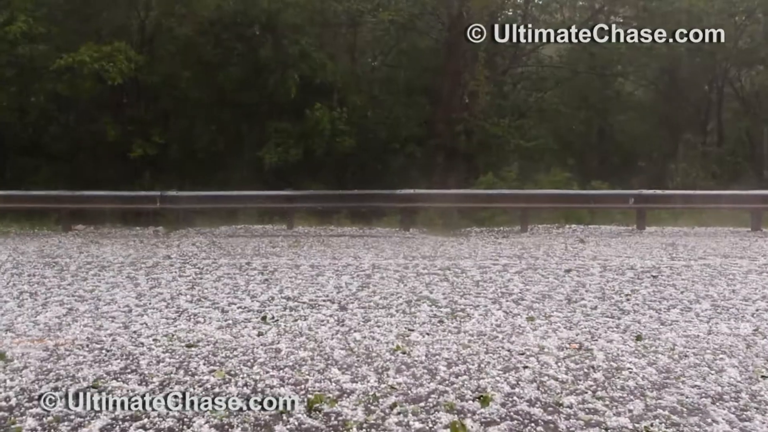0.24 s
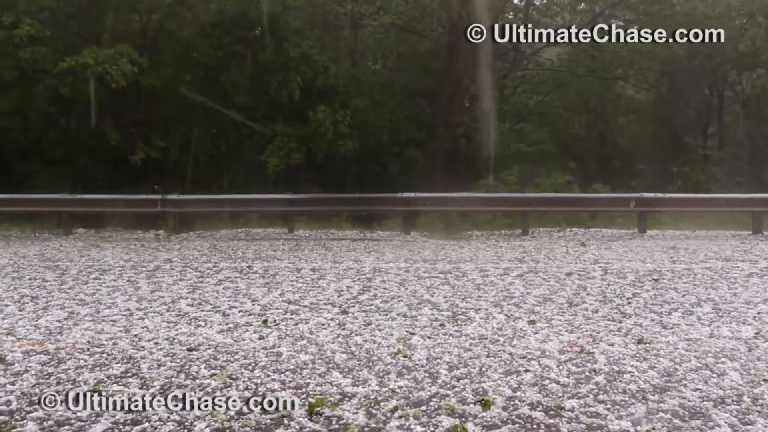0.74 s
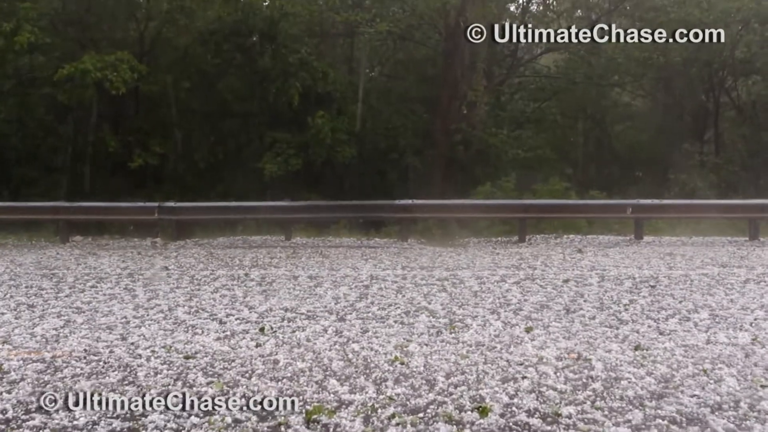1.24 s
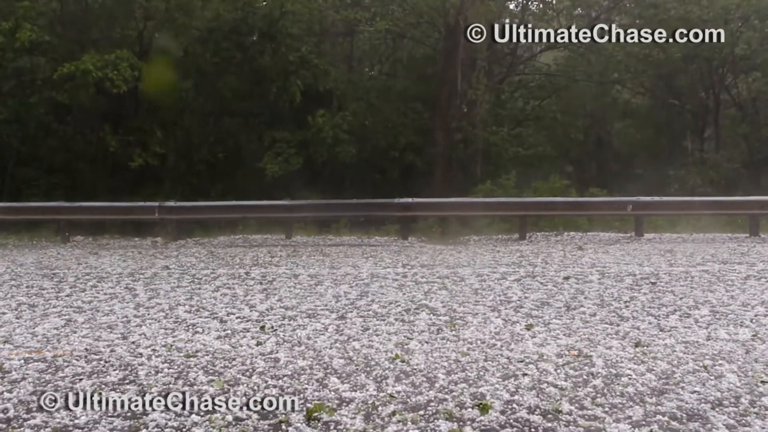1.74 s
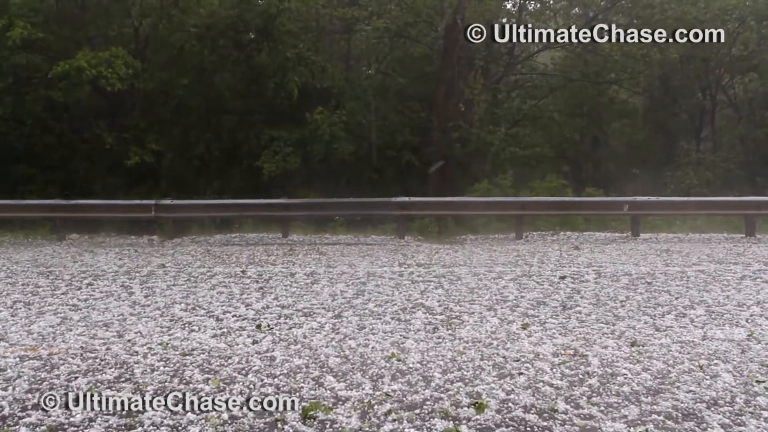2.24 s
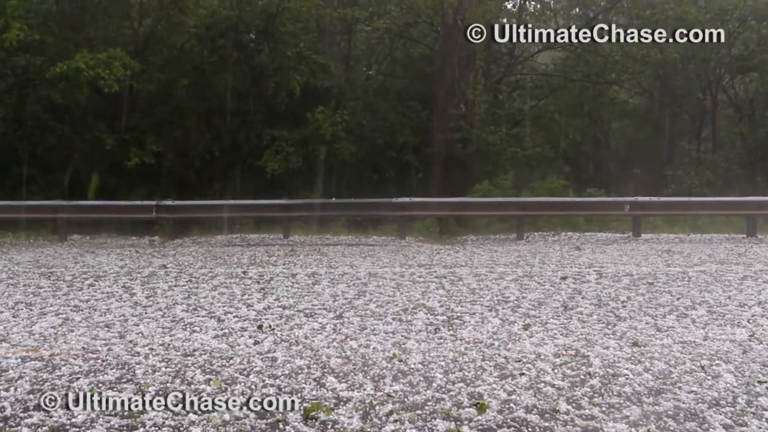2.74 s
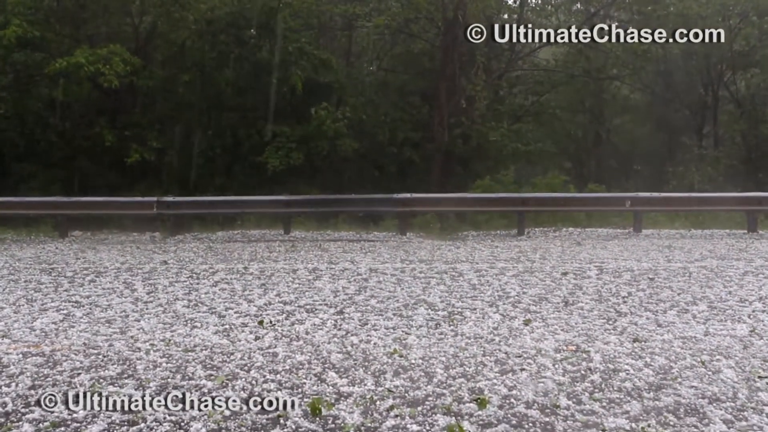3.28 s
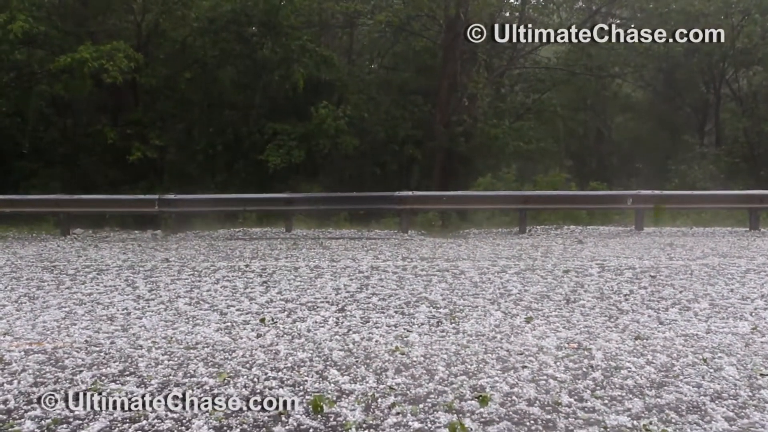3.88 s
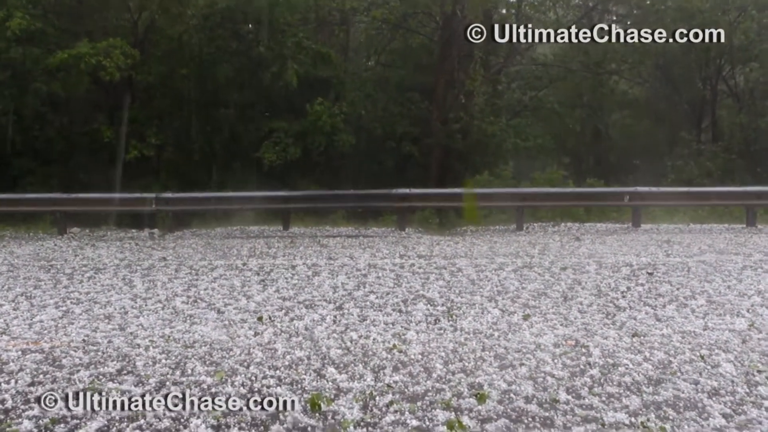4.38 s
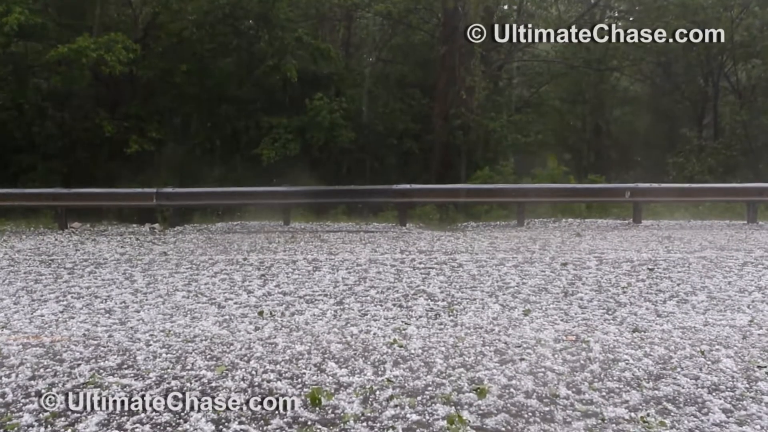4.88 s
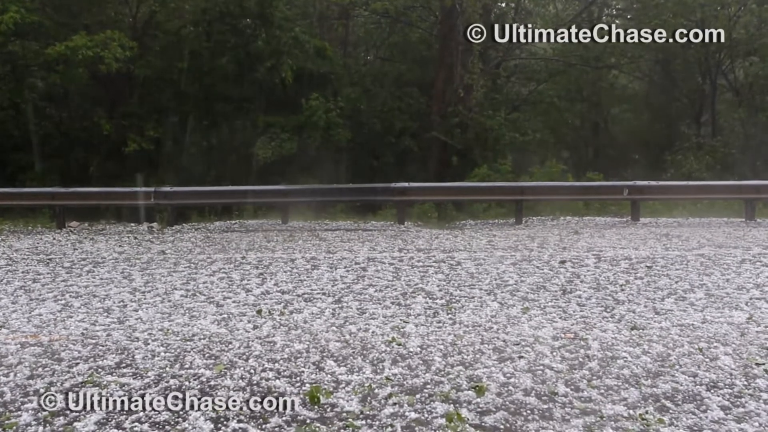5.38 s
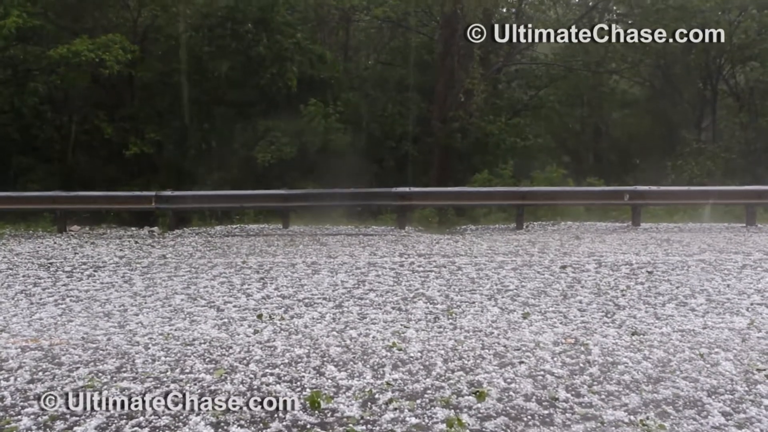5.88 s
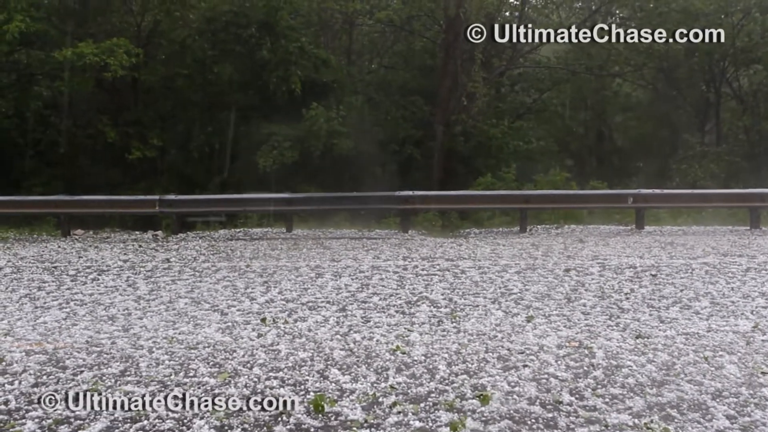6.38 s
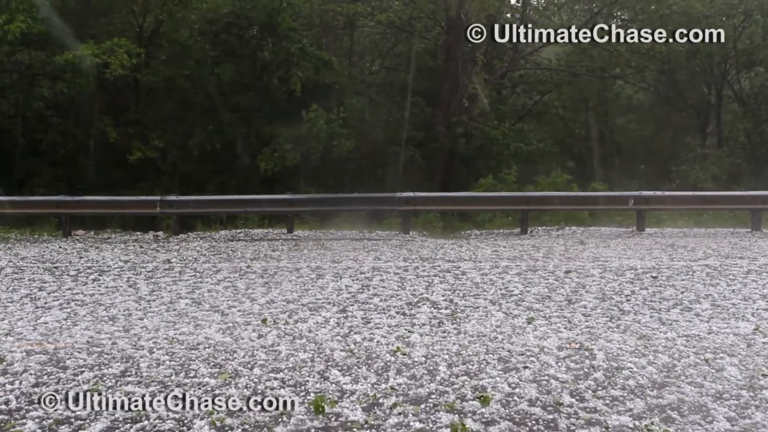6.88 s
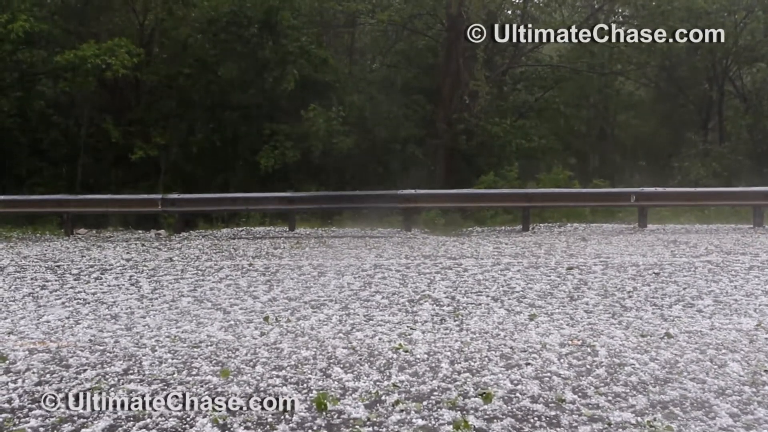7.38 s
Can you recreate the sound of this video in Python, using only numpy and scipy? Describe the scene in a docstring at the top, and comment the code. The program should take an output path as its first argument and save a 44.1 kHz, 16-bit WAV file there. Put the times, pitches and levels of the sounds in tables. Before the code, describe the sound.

Heard inside a parked car, dense hail bangs hollowly overhead, cracks against the windows, then thins slightly over pattering, hissing small stones.

```python
"""Hail on a parked car

Heard from inside: big stones boom on the sheet-metal roof, made from many ringing modes and a quick dent.
Others crack on the glass: noise bursts with a short ring and bright splinters. Chips of ice snap as tiny bursts.
A loose metal trim rings as a few fading tones. Small stones patter on the body and hiss on the road:
shaped noise and short knocks. A fast limiter holds the peaks of the whole mix.
"""
import sys
import numpy as np
from scipy import signal
from scipy.fft import rfft, irfft, next_fast_len
from scipy.io import wavfile
from scipy.ndimage import uniform_filter1d, minimum_filter1d, map_coordinates

SR = 44100
rng = np.random.default_rng(int(sys.argv[2]) if len(sys.argv) > 2 else 0)


def master(y):
    """Save y as 16-bit WAV."""
    cut = np.clip(np.atleast_2d(y).T, -1, 1)
    pcm = np.round(cut * 32767)  # scale
    wavfile.write(sys.argv[1], SR, pcm.astype(np.int16))


N = 336480  # samples in the scene


def amp(db):
    """Turn decibels into a plain factor."""
    return 10 ** (np.asarray(db) / 20)


def unit(x):
    """Scale each row to an average (RMS) strength of 1."""
    return x / np.sqrt(np.mean(x ** 2, axis=-1, keepdims=True) + 1e-20)


def along(points, hz):
    """Read a curve of (Hz, value) points at hz, on a log pitch axis."""
    f, v = np.transpose(points)
    return np.interp(np.log(hz + 1), np.log(f + 1), v)


def coloured(x, points):
    """Shape the spectrum of x by (Hz, dB) points, without shifting it in time."""
    n = x.shape[-1]
    m = next_fast_len(n + 512)
    gain = amp(along(points, np.fft.rfftfreq(m, 1 / SR)))
    return irfft(rfft(x, m) * gain, m)[..., :n]


def wobble(rate):
    """A smooth random curve with `rate` random points a second."""
    points = rng.standard_normal(int(N * rate / SR) + 4)
    return map_coordinates(points, [np.arange(N) * rate / SR])


def placed(times, sounds):
    """Add each row of sounds at its own time."""
    out = np.zeros(N + sounds.shape[1])
    for s, sound in zip(times, sounds):
        out[int(s * SR):][:len(sound)] += sound
    return out[:N]


def patter(rate, spread_db, t60):
    """A level curve that jumps with every small random stone and dies away; stone powers add up."""
    chance, size = rng.random(N), rng.exponential(size=N)
    stones = (chance < rate / SR) * amp(spread_db * size.clip(0, 3))
    t = np.arange(SR // 4) / SR
    power = signal.fftconvolve(stones ** 2, amp(-120 * t / t60))[:N]
    return np.sqrt(np.abs(power))  # abs: the fast convolution can dip just below zero


PELLET_HZ, PELLET_CYCLES = 2200, 14  # middle pitch; cycles a knock takes to fade by 60 dB


def pellets(count=1400):
    """Small stones knock at a pitch of their own: short fading tones of scattered pitch and size."""
    when, pitch = rng.random(count), rng.standard_normal((count, 1))
    size = rng.exponential(size=(count, 1))
    t = np.arange(SR // 50) / SR
    hz = (PELLET_HZ * amp(5 * pitch)).clip(500, 7000)
    fade = amp(2.6 * size.clip(0, 3) - 60 * t * hz / PELLET_CYCLES)
    return unit(placed(when * N / SR, fade * np.sin(2 * np.pi * hz * t)))


# Drumming of small stones on the body: (time [s], level [dB])
DRUM_LEVELS = [(0.0, -22), (0.36, -34.5), (1.55, -32.5), (1.78, -45), (2.12, -31), (3.23, -37), (4.27, -31),
               (4.59, -42), (5.61, -34.5), (6.33, -41), (7.2, -29), (7.63, -39.5)]
# Tone of many small stones on the body: (frequency [Hz], level per hertz [dB])
DRUM_TONE = [(25, -6.5), (134, 3.5), (294, 7.5), (604, 2), (753, -3.5), (3000, -21.5), (3900, -71)]
# Tone of hail on the road: (frequency [Hz], level per hertz [dB])
HISS_TONE = [(710, -4), (1200, -5), (1550, -5.5), (6490, -13), (10800, -13), (14100, -23), (14900, -48),
             (15400, -78)]
HISS_DB, HISS_FADE_DB, HISS_FADE_S = -45.5, 6, 3.25  # the hiss group starts 6 dB higher and settles
TAPS_DB, PELLETS_DB, TICKS_DB = -3.5, -3.5, -5.5  # against the road hiss


def storm():
    """Small stones drum on the body, hiss on the road, tap nearby and shatter in bright ticks: shaped noise."""
    s, drum_db = np.transpose(DRUM_LEVELS)
    t = np.arange(N) / SR
    drum_noise, hiss_noise, tap_noise, tick_noise = rng.standard_normal((4, N))
    drum_swell = patter(60, spread_db=6.5, t60=0.12) + 1.84  # stones over a steady share
    drum = unit(coloured(drum_noise * drum_swell, DRUM_TONE))
    hiss = unit(coloured(hiss_noise, HISS_TONE)) * amp(1.7 * wobble(22))
    taps = unit(coloured(tap_noise * patter(260, spread_db=3.5, t60=0.018), GLASS_TONE))
    ticks = unit(coloured(tick_noise * patter(200, spread_db=5.0, t60=0.009), SPLINTER_TONE))
    road = hiss + amp(TAPS_DB) * taps + amp(PELLETS_DB) * pellets() + amp(TICKS_DB) * ticks
    road_db = HISS_DB + HISS_FADE_DB * np.exp(-t / HISS_FADE_S)
    return amp(np.interp(t, s, drum_db)) * drum + amp(road_db) * road


# Big stones on the roof: (time [s], level [dB], loudest panel pitch [Hz],
# sharp-edge level [dB], fade by 60 dB from the panel's own damping [s])
ROOF_HITS = [(0.002, -7.5, 345, -18, 0.22), (0.02, -7, 950, -9.5, 0.36), (0.131, -16.5, 453, -10, 0.59),
             (0.172, -14, 388, -11, 0.55), (0.215, -7.5, 280, -12.5, 0.19), (0.2662, -6, 655, -11.5, 0.52),
             (0.297, 0.5, 887, -13, 0.55), (0.317, -9, 1040, -7, 0.33), (0.331, -4, 680, -12, 0.35),
             (0.391, -3.5, 318, -16, 0.25), (0.424, -13.5, 302, -15, 0.72), (0.485, -16.5, 584, -14, 0.72),
             (0.547, -12, 960, -12.5, 0.6), (0.571, -8, 935, -22, 0.48), (0.627, -9, 387, -15, 0.12),
             (0.673, -11, 350, -12.5, 0.6), (0.721, -7.5, 275, -14.5, 0.82),
             (0.794, -7.5, 533, -10.5, 0.58), (0.814, -10.5, 300, -37, 1), (0.861, -9.5, 476, -16.5, 1),
             (1.046, -4, 617, -10, 0.16), (1.122, -15.5, 850, -10, 0.19), (1.235, -7, 259, -8, 0.5),
             (1.261, -10, 300, -16, 1), (1.303, -20, 316, -6, 1), (1.367, -9, 590, -14.5, 0.63),
             (1.432, -13, 376, -6.5, 1), (1.447, -7.5, 1100, -14, 1), (1.48, -7.5, 250, -14.5, 1),
             (1.616, -18, 300, -8.5, 0.66), (1.652, -18.5, 432, -19, 0.46), (1.871, -16, 610, -13, 0.91),
             (1.886, -6.5, 960, -15, 0.83), (1.93, -7, 405, -10.5, 0.58), (1.962, -4, 427, -10.5, 0.84),
             (2.107, -2, 354, -11.5, 0.39), (2.148, -7, 250, -13.5, 0.88), (2.344, -14.5, 595, -10.5, 0.53),
             (2.403, -17.5, 590, -16, 0.97), (2.473, -14, 980, -15, 0.74), (2.54, -7, 304, -14.5, 0.47),
             (2.67, -5.5, 890, -18.5, 0.27), (2.731, -14, 256, -16.5, 1), (2.758, -10, 590, -14, 0.53),
             (2.896, -17.5, 314, -21, 0.31), (2.96, -14.5, 345, -32, 0.18), (3.2, -9, 276, -15, 0.55),
             (3.339, -19.5, 604, -3, 0.21), (3.4394, -8.5, 1280, -3, 0.063), (3.595, -10, 370, -13, 1),
             (3.628, -10.5, 440, -23, 0.59), (3.654, -14.5, 272, -3.5, 0.12), (3.709, -6.5, 274, -21, 1),
             (3.738, -6.5, 1060, -9, 1), (3.759, -9, 516, -30, 0.96), (3.921, -17, 576, -2.5, 0.11),
             (3.984, -16.5, 434, -15, 0.42), (4.058, -9, 315, -27.5, 0.24), (4.202, -11, 1020, -20, 0.37),
             (4.218, -11.5, 587, -14.5, 0.97), (4.251, -6.5, 450, -26, 0.89), (4.37, -6, 280, -19, 0.54),
             (4.468, -13, 325, -19, 0.21), (4.613, -19, 437, -8, 0.77), (4.663, -32, 1400, 9.5, 0.31),
             (4.766, -30, 369, -9, 0.49), (4.831, -17.5, 550, -15, 0.52), (4.869, -7.5, 290, -27, 0.23),
             (4.888, -16, 332, -24, 1), (5, -15.5, 1040, -22, 1), (5.165, -17.5, 870, -8, 1),
             (5.256, -7, 470, -7, 0.11), (5.344, -26.5, 1100, -1.5, 0.71), (5.383, -9, 910, -9.5, 0.34),
             (5.401, -8, 886, -15.5, 0.42), (5.438, -12.5, 630, -32, 0.66), (5.579, -24, 250, -6, 0.77),
             (5.632, -8, 608, -12.5, 0.48), (5.764, -13, 590, -16, 0.42), (5.879, -8.5, 329, -18.5, 0.49),
             (5.912, -13, 396, -3, 0.1), (5.944, -18.5, 288, -13, 0.73), (6.024, -26, 1090, -1.5, 0.6),
             (6.07, -14.5, 350, -16, 0.11), (6.162, -10.5, 640, -7.5, 0.16), (6.211, -14, 1320, -6, 0.13),
             (6.256, -23.5, 520, -17, 0.36), (6.407, -18, 477, -17, 0.94), (6.461, -28, 358, 1, 1),
             (6.492, -11.5, 930, -9.5, 0.79), (6.508, -4, 596, -16, 0.4), (6.562, -15, 357, -32, 0.73),
             (6.744, -12, 630, -14, 0.16), (6.797, -22, 413, -6, 0.51), (6.815, -15, 764, -9.5, 0.23),
             (6.915, -6.5, 362, -9, 1), (6.984, -9.5, 1040, -19, 1), (7.048, -16, 317, -10, 0.2),
             (7.085, -16, 300, -37, 0.077), (7.154, -15, 570, -13, 0.97), (7.176, -11, 980, -23, 0.8),
             (7.209, -25, 313, -5, 0.81), (7.312, -10, 264, -22.5, 0.95), (7.437, -23.5, 610, -16, 0.33),
             (7.581, -9, 290, -15, 1)]
# Strength of the roof modes: (frequency [Hz], level [dB])
ROOF_TONE = [(40, -54), (100, -1), (150, 2.5), (174, 6), (205, -4), (320, 3.5), (600, 3), (1100, 2.5),
             (2000, -0.5), (4000, -10), (8000, -26)]
# How long the roof modes ring: (frequency [Hz], fade by 60 dB [s])
ROOF_FADE = [(80, 1), (200, 1), (500, 0.53), (1200, 0.28), (3000, 0.17), (6000, 0.083)]
EDGE_USUAL_DB, PANEL_USUAL_HZ = -10, 440  # an ordinary blow
BOOM_DB, BOOM_PER_EDGE, BOOM_DB_PER_OCTAVE = -10, -0.29, -1.5  # sharp blows and small, high panels boom less
DULL_PER_EDGE = 0.35  # dB an octave of tilt for each dB of edge: soft blows are dull throughout
DENT_DB, DENT_DB_PER_OCTAVE = -7, -6.5  # the dent is strongest on wide, low panels
DENT_HZ, DENT_T60 = 319, 0.038  # middle pitch; seconds to fade by 60 dB
SPREAD_S = 0.0013  # time for the ringing to spread through the sheet


def roof(count=340):
    """A plate has dense modes; each stone lands elsewhere and stirs them anew, most those of its own panel."""
    s, db, panel_hz, edge_db, t60 = np.transpose(ROOF_HITS)[:, :, None]
    sharper_db = edge_db - EDGE_USUAL_DB
    panel_octaves = np.log2(panel_hz / PANEL_USUAL_HZ)
    boom_db = BOOM_DB + BOOM_PER_EDGE * sharper_db + BOOM_DB_PER_OCTAVE * panel_octaves

    t = np.arange(2 * SR // 5) / SR
    hz = 45 + 7955 * ((np.arange(count) + rng.random(count)) / count) ** 1.8
    rise = 1 - np.exp(-t * hz[:, None] / 1.66)  # low modes swell more slowly
    fade = amp(-60 * t / along(ROOF_FADE, hz)[:, None])
    modes = np.sin(2 * np.pi * (hz[:, None] * t + rng.random((count, 1)))) * fade * rise

    spacing = np.sqrt(np.gradient(hz).clip(1))  # a lone mode stands for a wider band
    away = np.log(hz / panel_hz)
    panel = amp(7 * np.exp(-(away / 0.09) ** 2) + 6.4 * np.exp(-(away / 2.2) ** 2))  # a peak on a broad hump
    tilt = amp(DULL_PER_EDGE * sharper_db * np.log2(hz.clip(250, 1500) / PANEL_USUAL_HZ))
    strength = rng.standard_normal((len(s), count)) * amp(along(ROOF_TONE, hz)) * spacing * panel * tilt

    # Each blow has a low boom, a middle body and a sharp high edge.
    low = along([(180, 1.0), (300, 0.01)], hz)
    high = along([(1200, 0.055), (2000, 0.85)], hz)
    blows = unit(strength * (1 - low - high))
    blows += amp(boom_db) * unit(strength * low) + amp(edge_db) * unit(strength * high)
    ring = amp(-60 * t / t60) * (blows @ modes) / np.sqrt(2 * count)  # peaks near 1

    # The sheet first gives under the stone.
    dent_db = DENT_DB + DENT_DB_PER_OCTAVE * panel_octaves
    dent_hz = DENT_HZ * amp(rng.standard_normal(s.shape))
    dent = -amp(dent_db - 60 * t / DENT_T60) * np.sin(2 * np.pi * dent_hz * t)
    return placed(s[:, 0], amp(db) * (dent + ring * (1 - np.exp(-t / SPREAD_S))))


# Stones cracking on glass: (time [s], level [dB], splinter level [dB],
# pitch of the spot [Hz], fade by 60 dB [s])
GLASS_HITS = [(0.022, -17, -14, 1540, 0.042), (0.3062, -15, -18, 1780, 0.075),
              (0.3257, -11, -30, 1620, 0.062), (0.3983, -13.5, -21, 1500, 0.083),
              (0.4253, -17.5, -31, 2900, 0.084), (0.4877, -17.5, -9, 2340, 0.07),
              (0.6297, -12.5, -25, 2800, 0.067), (0.679, -14.5, -14, 1680, 0.05),
              (0.718, -18, -13, 1750, 0.053), (0.8384, -16, -10, 3020, 0.05), (0.942, -29, 3, 2210, 0.034),
              (1.047, -11.5, -10, 2360, 0.036), (1.435, -13, -32, 1970, 0.049),
              (1.785, -25, -20, 1870, 0.14), (1.965, -16.5, -23, 1510, 0.13),
              (2.1112, -10, -29, 1510, 0.05), (3.2082, -23, -6, 1960, 0.053),
              (3.4403, -12, -4, 2250, 0.067), (3.481, -31, 6, 5840, 0.18), (3.5083, -31, 6, 2270, 0.13),
              (3.5407, -26.5, -2, 2350, 0.11), (3.566, -26.5, -5, 1510, 0.18),
              (3.71, -14.5, -26, 2040, 0.067), (4.1944, -13.5, -8, 3230, 0.06),
              (4.256, -17.5, -16, 1540, 0.12), (4.464, -5.5, -18, 2460, 0.054),
              (4.873, -14.5, -19, 2700, 0.06), (5.468, -22.5, -8, 1750, 0.13),
              (5.616, -22, -9, 2150, 0.073), (5.9135, -14, -25, 2370, 0.032),
              (6.1646, -16.5, -22, 1470, 0.055), (6.2107, -9, -6, 2020, 0.052),
              (6.5053, -11, -31, 1870, 0.069), (7.209, -16.5, -1, 2390, 0.071),
              (7.334, -25, -6, 2330, 0.089), ]
# Dull part of a crack, also colours the storm's taps: (frequency [Hz], level [dB])
GLASS_TONE = [(700, 7.5), (1500, 4.5), (3000, 6.5), (5000, 3), (8000, -5), (14000, -23.5)]
# Bright part of a crack, also colours the storm's ticks: (frequency [Hz], level [dB])
SPLINTER_TONE = [(4000, -17), (7000, -13.5), (11000, -9.5), (13000, -22), (14500, -34), (15500, -47)]
# Modes of the glass pane: (frequency [Hz], level [dB])
PANE_MODES = [(1470, 0.5), (1900, -2), (2310, -7), (2600, -4), (3180, -5), (3700, 0.5), (4450, -0.5),
              (5520, -8)]
PANE_DB, PANE_T60 = -7, 0.029  # ring of the pane against the burst; seconds to fade by 60 dB
PANE_SCATTER_DB = 3  # each stone stirs the modes anew
SPLINTER_T60 = 0.37  # s, extra damping of the bright part
HOLD_S = 0.002  # the crack stays level this long before it starts to fade


def glass():
    """Ice breaks on the pane: a burst around the spot's pitch, the pane's modes near it, and bright splinters."""
    s, db, splinter_db, spot_hz, t60 = np.transpose(GLASS_HITS)[:, :, None]
    t = np.arange(SR // 8) / SR
    after = (t - HOLD_S).clip(0)
    noise = rng.standard_normal((len(s), 2, len(t)))
    hz = np.fft.rfftfreq(len(t), 1 / SR) + 1
    spot = amp(11 * np.exp(-(np.log(hz / spot_hz) / 0.35) ** 2))
    dull = unit(irfft(rfft(coloured(noise[:, 0], GLASS_TONE)) * spot, len(t)))
    bright = unit(coloured(noise[:, 1], SPLINTER_TONE)) * amp(splinter_db - 60 * t / SPLINTER_T60)
    burst = amp(db - 60 * after / t60) * (dull + bright) / 2

    mode_hz, mode_db = np.transpose(PANE_MODES)[:, :, None]
    modes = amp(mode_db - 60 * after / PANE_T60) * np.sin(2 * np.pi * mode_hz * t)
    scatter_db = PANE_SCATTER_DB * rng.standard_normal((len(s), len(PANE_MODES)))
    stirred = amp(scatter_db - 4.2 * np.log2(mode_hz.T / spot_hz) ** 2)
    ring = amp(db + PANE_DB) * unit(stirred) @ modes / len(PANE_MODES) ** 0.5
    return placed(s[:, 0], (ring + burst) * (1 - np.exp(-t / 0.00037)))  # a very quick rise


# Ice chips snapping close by: (time [s], level [dB], pitch [Hz])
CHIP_SNAPS = [(1.397, -25, 8010), (2.212, -23, 8250), (2.808, -25, 4970), (2.8224, -25, 7990),
              (2.904, -15, 9900), (3.0275, -27, 9610), (3.112, -27, 7900), (3.2688, -21.5, 8040),
              (3.4402, -10, 4500), (3.492, -10.5, 5700), (3.8885, -24, 10400), (5.4675, -24, 4930),
              (7.211, -12.5, 4730), (7.2724, -27, 8490)]
CHIP_T60, CHIP_WIDE = 0.011, 0.22  # seconds to fade by 60 dB; width of the band in log units


def chips():
    """A breaking chip gives a very short bright snap: noise around its pitch over a broad bright floor."""
    s, db, hz = np.transpose(CHIP_SNAPS)[:, :, None]
    t = np.arange(SR // 40) / SR
    f = np.fft.rfftfreq(len(t), 1 / SR) + 1
    band = np.exp(-(np.log(f / hz) / CHIP_WIDE) ** 2)
    shape = (band + 0.4 * (f > 2500)) * (f < 14500)
    snap = unit(irfft(rfft(rng.standard_normal((len(s), len(t)))) * shape, len(t)))
    return placed(s[:, 0], amp(db - 6.0 - 60 * t / CHIP_T60) * snap)


# Tones of the loose metal strip: (frequency [Hz], level [dB], fade by 60 dB [s])
TRIM_TONES = [(2317, 0, .27), (2820, -7, .3), (3445, -6, .28), (4598, -9, .2), (7440, -6, .06)]
# When the strip rings: (time [s], level [dB])
TRIM_RINGS = [(1.55, -39), (7.331, -32.5)]
TRIM_WAVER_DB = 2.5  # the loose strip flutters


def trim():
    """A thin metal strip rings for a moment: a few fading tones, each with a fluttering level."""
    s, db = np.transpose(TRIM_RINGS)
    t = np.arange(SR // 3) / SR
    ring = np.zeros(len(t))
    for hz, level, t60 in TRIM_TONES:
        flutter_db = TRIM_WAVER_DB * wobble(49)[:len(t)]
        ring += amp(level - 60 * t / t60 + flutter_db) * np.sin(2 * np.pi * hz * t)
    return placed(s, amp(db)[:, None] * (1 - np.exp(-t / 0.0016)) * ring)


def scene():
    """All the hail sounds added together, as one channel."""
    return (storm() + roof() + glass() + chips() + trim())[None]


LIMIT_DB = -5.2  # peaks above this are turned down, before the filters
LOW_CUT_HZ, TOP_HZ = 68, 15570


def record(dry):
    """A fast limiter holds the peaks; the deep bass is cut and nothing passes above the top frequency."""
    need = np.minimum(1, amp(LIMIT_DB) / (np.abs(dry) + 1e-9))
    gain = uniform_filter1d(minimum_filter1d(need, size=220), size=110)  # sizes in samples
    m = next_fast_len(N + 4096)
    hz = np.fft.rfftfreq(m, 1 / SR)
    low_cut = (1j * hz / (LOW_CUT_HZ + 1j * hz)) ** 2
    return irfft(rfft(dry * gain, m) * low_cut * (hz < TOP_HZ), m)[..., :N]


dry = scene()
out = record(dry)
master(out)
```